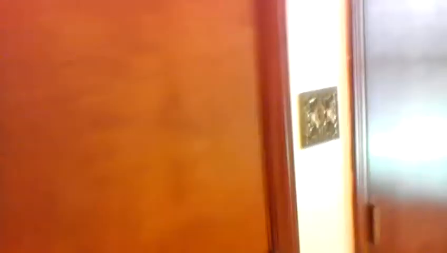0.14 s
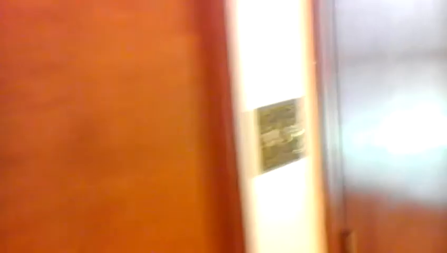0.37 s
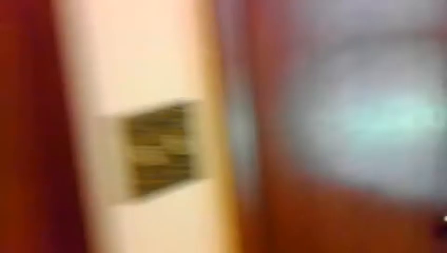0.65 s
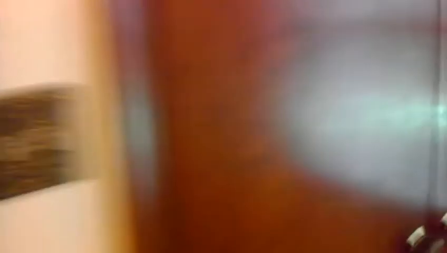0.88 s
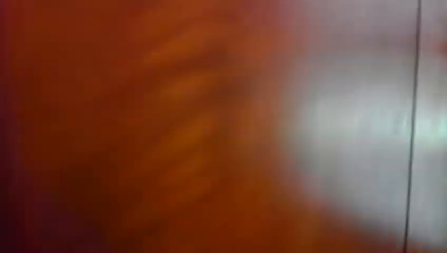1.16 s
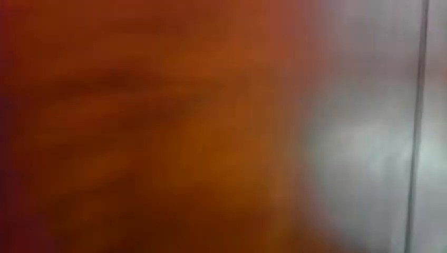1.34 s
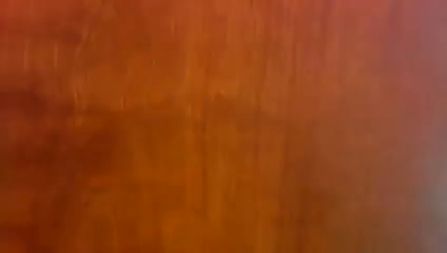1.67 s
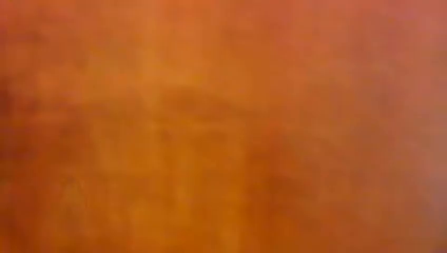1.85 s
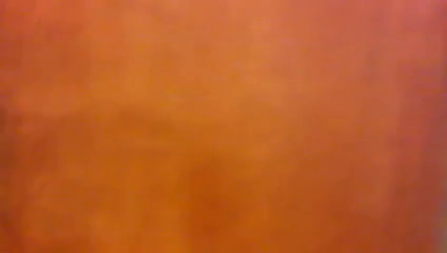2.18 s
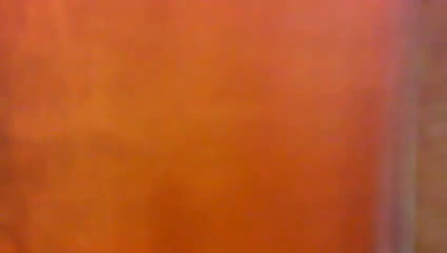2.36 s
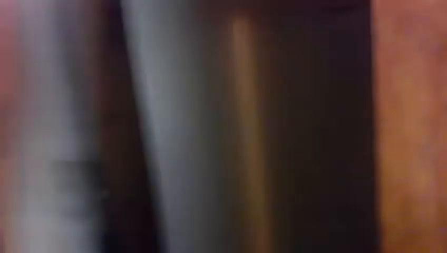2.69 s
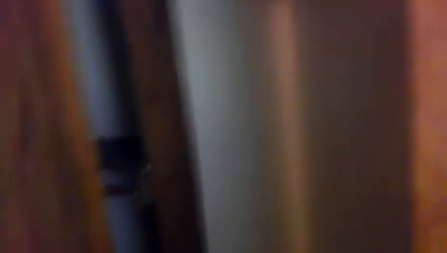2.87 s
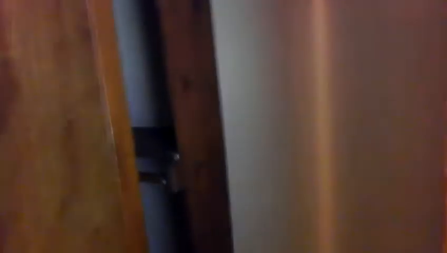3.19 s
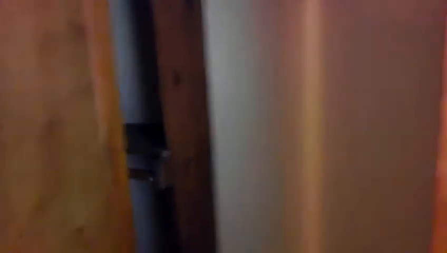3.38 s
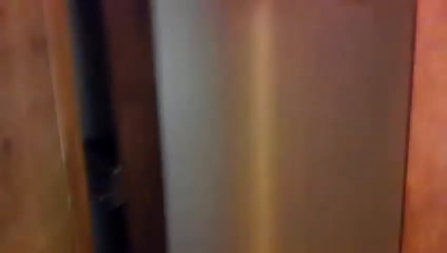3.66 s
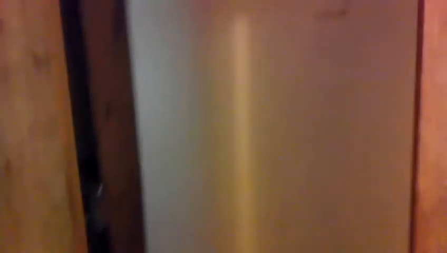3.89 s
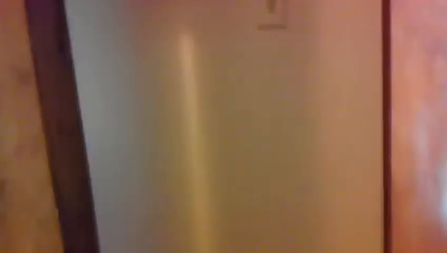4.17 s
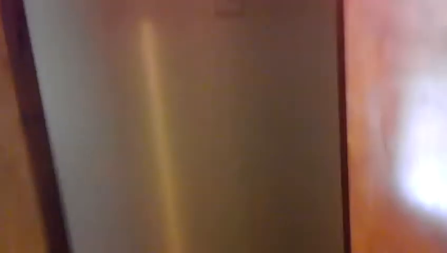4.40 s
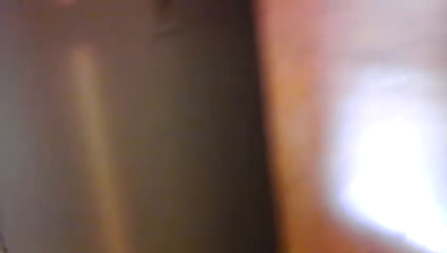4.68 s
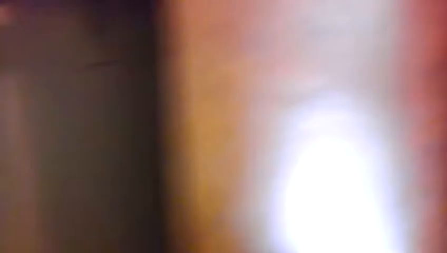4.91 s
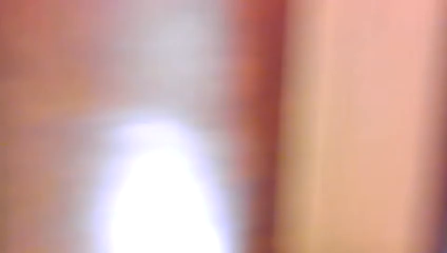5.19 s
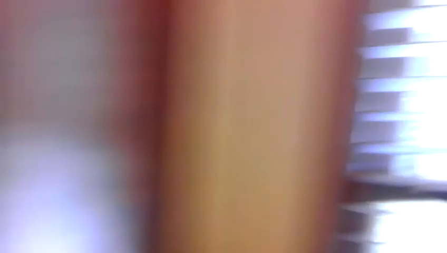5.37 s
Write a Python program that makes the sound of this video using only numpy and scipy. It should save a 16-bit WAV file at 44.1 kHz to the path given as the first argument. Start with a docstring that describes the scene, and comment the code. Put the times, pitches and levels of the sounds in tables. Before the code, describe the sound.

Indoors, one wooden door latches and another bangs free with a rattle, followed by a hollow knock and quiet footsteps.

```python
"""A small hall, heard from a stereo microphone carried by someone shutting and opening wooden doors.
A hinge squeaks and a door claps into its latch; a closet door knocks three times against its frame,
bangs free close by and rattles as it opens. Each blow is a crack, ringing boards and a short room tail.
Soft steps, hollow wooden knocks and rustling clothes come and go over a faint mains hum."""
import sys
import numpy as np
from scipy import signal
from scipy.fft import rfft, irfft
from scipy.io import wavfile

SR = 44100
rng = np.random.default_rng(int(sys.argv[2]) if len(sys.argv) > 2 else 0)


def dump_mix(stems):
    """Bounce the given channels to the path in sys.argv[1] as a 16-bit WAV at rate SR."""
    frames = np.atleast_2d(stems).T  # one column per channel
    limited = np.clip(frames, -1, 1)  # hard clip at full scale
    pcm = np.round(limited * 32767).astype(np.int16)
    wavfile.write(sys.argv[1], SR, pcm)


N = 244314

# movements of the walker or a door: start_s, length_s, rise_s, rub_db, hiss_db, rumble_db
MOVEMENTS = [(0, 0.43, 0.0033, -53, -60.5, -50), (0.417, 0.65, 0.25, -53, -58, -51),
             (0.851, 0.17, 0.057, -42, -52, -60), (1.161, 0.47, 0.23, -50, -59.5, -42.5),
             (1.676, 0.84, 0.054, -51, -71, -42.5), (2.495, 0.15, 0.14, -41.5, -63, -71),
             (2.738, 0.054, 0.032, -46.5, -61.5, -56), (3.06, 0.051, 0.033, -57.5, -63.5, -55),
             (3.168, 0.51, .06, -65, -70.5, -65), (3.605, 0.56, 0.26, -52.5, -60.5, -54.5),
             (4.166, .11, 0.046, -44.5, -58, -67), (4.277, 0.094, 0.062, -46.5, -58.5, -47.5),
             (4.659, 0.46, 0.036, -55.5, -60.5, -51), (5.22, 0.3, 0.11, -56, -61.5, -47.5)]


def closet_bang(flex_hz=268, flex_peak_s=0.0069, flex_boost_db=2):
    """Close to the microphone the closet door breaks free, and its whole panel flexes for a few cycles."""
    # the bang: start_s, level_db, bass_db, treble_db, crack_t60_s, tail_db, ring_db
    bangs = [(2.1041, 0.83, -2.5, 0, 0.058, -18, -10)]
    # colour of its crack: freq_hz, density_db
    colour = [(45, -19), (90, 4), (160, 7), (290, 3), (450, -5), (750, -10), (1400, -6.5), (2600, -16.5),
              (4200, -28), (6200, -29.5), (9000, -34.5), (14000, -50)]
    # modes of the freed door: pitch_hz, level_db, t60_s
    modes = [(91, -14, 1.2), (145, -3, .5), (214, -6, .45), (248, -1, .55), (295, 0, .48), (443, -12, .4),
             (548, -6, .25), (668, -16, .3), (822, -13, .33), (894, -12, .23), (1128, -17, .44),
             (1542, -19, .3)]
    t = np.arange(SR) / SR
    swell = (t / flex_peak_s * np.exp(1 - t / flex_peak_s)) ** 4
    flex = swell * np.sin(2 * np.pi * flex_hz * t)
    mix = wood_blows(bangs, colour, modes, tail_treble_db=-16.5, pan_db=-0.9)
    for start_s, level_db, *_ in bangs:
        add(mix, start_s, amp(level_db + flex_boost_db) * flex[None])
    return mix


def closet_knocks():
    """The closet door knocks against its frame and its panel rings."""
    # the knocks: start_s, level_db, bass_db, treble_db, crack_t60_s, tail_db, ring_db
    blows = [(1.717, -29, 3.5, 2, 0.043, -13, 2.5), (1.8055, -11, 0.5, -9.5, 0.061, -9.5, -4.5),
             (1.9475, -13, 11.5, -1, 0.14, -9.5, -11.5)]
    # colour of wood on wood: freq_hz, density_db
    colour = [(45, -9), (90, -2.5), (160, 7.5), (280, 10.5), (450, 4), (850, 3.5), (1300, 1.5), (2600, -5),
              (4200, -16.5), (6000, -24), (9000, -22), (14000, -70)]
    # modes of the closet door: pitch_hz, level_db, t60_s
    modes = [(95.1, 3.5, 0.47), (167.3, 8, 0.54), (178.6, -0.5, 0.37), (213, -1, 0.2), (296.4, -17, 0.58),
             (354, -10.5, 0.81), (479, -12.5, 0.51), (520, 0.5, 0.4), (520, -0.5, 0.59), (800, -13.5, 0.41),
             (893, -25.5, 0.098), (1230, -0.5, 0.099)]
    return wood_blows(blows, colour, modes, tail_treble_db=-21, pan_db=-1.3)


def latching_door():
    """A door claps into its latch and rings on."""
    # the clap: start_s, level_db, bass_db, treble_db, crack_t60_s, tail_db, ring_db
    claps = [(0.9595, -13.5, -0.54, 0.027, 0.068, 0, -6)]
    # colour of the clap: freq_hz, density_db
    colour = [(45, -17.5), (90, -8), (190, -1.5), (380, 2), (560, -10.5), (850, -6), (1500, -10),
              (2400, -9), (3100, 0), (4200, -28.5), (6200, -8), (8000, -30), (11500, -17.5), (14000, -44)]
    # modes of this door: pitch_hz, level_db, t60_s
    modes = [(181.4, 4.5, 0.99), (244.6, 5.5, 0.94), (368.4, 2, 0.49), (436.4, -1, 0.48), (547, 3, 0.51),
             (843, -14.5, 0.7), (1157, -17, 0.31), (1640, -17.5, 0.33), (1900, -10.5, 0.27),
             (2401, -11, 0.63), (2430, -15.5, 0.32), (3300, -12, 0.38), (3000, -10.5, 0.23),
             (3332, -16.5, 0.33)]
    return wood_blows(claps, colour, modes, tail_treble_db=-7, pan_db=-1.6)


def bolt():
    """The steel bolt pings briefly each time it meets its plate."""
    # snaps against the plate: start_s, level_db
    pings = [(0.9587, -13), (1.715, -40), (1.806, -31)]
    # modes of the bolt: pitch_hz, level_db, t60_s
    modes = [(2340, -5, .06), (2680, -2, .06), (2875, 0, .08), (3046, -2, .06), (3216, -1, .05),
             (3420, -5, .04)]
    mix = np.zeros((2, N))
    for start_s, level_db in pings:
        add(mix, start_s, amp(level_db) * ring(modes)[None])
    return mix


def catch_clicks():
    """Catch and hinges click and rattle; harder contacts are brighter."""
    # contacts: start_s, level_db, treble_db
    clicks = [(.382, -32.5, -16), (0.5944, -29.5, -25), (1.116, -18.5, -17), (1.89, -39.5, 15.5),
              (1.980, -49.5, 39.5), (1.991, -46, 33), (2.134, -21.5, 2), (2.268, -14.5, -19),
              (2.330, -20.5, -15.5), (2.393, -21.5, -10), (2.412, -24, -32), (2.449, -26.5, -15),
              (2.472, -29.5, -18), (2.509, -33.5, 2), (4.05, -36.5, -9), (4.273, -42.5, -4),
              (4.693, -51, -15), (5.039, -53, 18), (5.08, -55, 9)]
    # colour of the catch: freq_hz, density_db
    colour = [(60, -30.5), (250, 10), (800, -1), (1700, 3.5), (3000, 1), (4500, -10), (8000, -21.5),
              (14000, -39)]
    mix = np.zeros((2, N))
    for start_s, level_db, treble_db in clicks:
        click = crack(colour, t60_s=0.056, tail_db=-11, tail_treble_db=-2, treble_db=treble_db)
        add(mix, start_s, amp(level_db) * click)
    return mix


def hollow_knocks(bass_db=-2, treble_db=-1, t60_s=0.073, tail_db=-11):
    """Hollow wooden knocks: the door just before it latches, then two later ones."""
    # the knocks: start_s, level_db, ring_db
    knocks = [(.932, -27.5, 4), (3.869, -21, 1), (4.249, -35, 2)]
    # their hollow colour: freq_hz, density_db
    colour = [(45, -20.5), (100, -7), (160, 0.5), (250, 7.5), (400, 4.5), (700, -2), (950, -12),
              (1400, -37.5), (4000, -47), (14000, -44)]
    # modes of the wood: pitch_hz, level_db, t60_s
    modes = [(157, -8, 0.4), (285, -24, 0.1), (332, -7.5, 0.14), (372, 3.5, 0.11), (492, -2, 0.16),
             (550, 2.5, 0.049), (697, -13, .15)]
    blows = [(start_s, level_db, bass_db, treble_db, t60_s, tail_db, ring_db)
             for start_s, level_db, ring_db in knocks]
    return wood_blows(blows, colour, modes, tail_treble_db=0.5, pan_db=-0.5)


def steps():
    """Soft footfalls; the more weight on the foot, the deeper the thud."""
    # feet on the floor: start_s, level_db, bass_db
    footfalls = [(0.603, -32.5, -10.5), (0.739, -27, -24), (1.159, -35.5, 14), (1.377, -21, -20),
                 (3.193, -38, -1), (3.254, -50, -14), (3.535, -44.5, 11.5), (3.594, -43.5, 6.5),
                 (5.114, -31, -26), (5.355, -27.5, -30)]
    # colour of a thud: freq_hz, density_db
    colour = [(40, -9.5), (75, -3), (130, 6.5), (220, -2.5), (350, -11.5), (800, -26), (3000, -46.5),
              (14000, -59)]
    mix = np.zeros((2, N))
    for start_s, level_db, bass_db in footfalls:
        thud = crack(colour, t60_s=0.16, tail_db=-17, tail_treble_db=-8.5, bass_db=bass_db, treble_db=-8)
        add(mix, start_s, amp(level_db) * thud)
    return mix


def hand_bumps():
    """A hand bumps along the closet door, too lightly to leave a clear tone."""
    # pats on the wood: start_s, level_db
    pats = [(1.238, -32), (1.370, -35.5), (1.495, -32.5), (1.616, -35.5)]
    # colour of a pat: freq_hz, density_db
    colour = [(100, -21.5), (400, 2.5), (900, 3), (1400, -6.5), (2200, -13.5), (4000, -25.5), (14000, -50)]
    mix = np.zeros((2, N))
    for start_s, level_db in pats:
        add(mix, start_s, amp(level_db) * crack(colour, t60_s=0.1, tail_db=-12, tail_treble_db=-3))
    return mix


def rustle(rub_boost_db=6, snag_db=-9, snags_per_s=70, release_s=0.017):
    """Cloth and door edges slide unevenly, with a fine hiss; folds snag and let go."""
    # colour of rubbing cloth: freq_hz, density_db
    rub_colour = [(100, -22), (280, 0), (550, 2), (1100, 4), (1700, -4), (2800, -7), (4500, -14.5),
                  (7000, -24.5), (14000, -37.5)]
    # colour of the hiss: freq_hz, density_db
    hiss_colour = [(2000, -19.5), (4500, -6.5), (7000, -5), (9000, -2.5), (12000, -3), (14000, -7.5)]
    snags = (rng.random(N) < snags_per_s / SR) * rng.exponential(1, N)
    release = np.exp(-np.arange(SR // 20) / SR / release_s)
    snag_lift = amp(snag_db) * unit_rms(signal.oaconvolve(snags, release)[:N])
    *_, rub_db, hiss_db, _ = np.transpose(MOVEMENTS)
    rubbing = movement_gain(rub_db + rub_boost_db, fade_db_per_s=122.5) * steady_noise(rub_colour)
    hiss = movement_gain(hiss_db, fade_db_per_s=72.5) * steady_noise(hiss_colour)
    return rubbing * np.hypot(1, snag_lift) + hiss


def rumble(boost_db=1, uneven_db=0.5):
    """Swinging doors and loaded boards shudder with each movement."""
    # colour of the shudder: freq_hz, density_db
    colour = [(30, -20.5), (60, -11.5), (100, -8.5), (130, 0.5), (165, 3), (200, 4.5), (225, 3), (275, 0.5),
              (450, -5), (900, -19.5), (3000, -49.5)]
    *_, rumble_db = np.transpose(MOVEMENTS)
    shudder = amp(boost_db - uneven_db * flutter(rate_hz=12))
    return movement_gain(rumble_db, fade_db_per_s=41.5) * shudder * steady_noise(colour)


def hinge(waver=0.006):
    """A dry hinge pin sings for a moment at an unsteady pitch."""
    # thin squeaks: start_s, length_s, pitch_hz, level_db
    squeaks = [(0.556, 0.042, 8500, -60), (0.701, 0.045, 8570, -55)]
    mix = np.zeros((2, N))
    unsteady = 1 + waver * flutter(rate_hz=120)
    for start_s, length_s, pitch_hz, level_db in squeaks:
        wavering_hz = pitch_hz * unsteady[round(start_s * SR):][:round(length_s * SR)]
        cycles = np.cumsum(wavering_hz) / SR
        squeak = np.hanning(len(cycles)) * np.sin(2 * np.pi * cycles)
        add(mix, start_s, amp(level_db) * squeak[None])
    return mix


def room_tone(air_db=-66, hum_hz=120):
    """Faint air in the hall, and a mains hum that is louder at first."""
    # colour of the air: freq_hz, density_db
    air_colour = [(18, -45.5), (30, -25), (109, -18.5), (336, -28.5), (941, -10.5), (1420, -19),
                  (2140, -10), (5010, -28), (6310, -34), (12600, -17.5), (14000, -40)]
    # course of the hum: time_s, level_db
    hum_levels = [(.47, -51), (.6, -63)]
    hum = gain_curve(hum_levels) * np.sin(2 * np.pi * hum_hz * np.arange(N) / SR)
    return amp(air_db) * steady_noise(air_colour) + hum


def wood_blows(blows, colour, modes, tail_treble_db, pan_db):
    """Each blow cracks and sets the board ringing; pan_db is left minus right."""
    mix = np.zeros((2, N))
    for start_s, level_db, bass_db, treble_db, t60_s, tail_db, ring_db in blows:
        board = amp(ring_db) * ring(modes, bass_db, treble_db)
        contact = crack(colour, t60_s, tail_db, tail_treble_db, bass_db, treble_db)
        add(mix, start_s, amp(level_db) * (contact + board))
    return mix * amp([[pan_db / 2], [-pan_db / 2]])


def crack(colour, t60_s, tail_db, tail_treble_db, bass_db=0, treble_db=0, bands=18, fill_s=0.0095):
    """Countless short modes die at once; the hall keeps each band sounding for its own time."""
    # resonances of door boards and fittings: centre_hz, width_hz, boost_db
    fittings = [(886, 70, 2.5), (1160, 20, 11), (1580, 20, 2.5), (1940, 200, 3.5), (2420, 110, 0.5),
                (2420, 210, 0.5), (2660, 30, 2), (2820, 23, 7.5), (3210, 29, -14.5), (3864, 270, 10.5),
                (5700, 1500, 2.5)]
    # reverberation of the hall: freq_hz, t60_s
    hall_decay = [(60, 0.62), (150, 1.09), (300, 0.3), (600, 0.79), (1500, 0.53), (3000, 0.38),
                  (6000, 0.41), (13000, 0.29)]
    t = np.arange(SR) / SR
    centres = np.geomspace(42, 15000, bands)
    hz, noise = stereo_spectra(len(t))
    noise *= amp(sum(db / (1 + (2 * (hz - centre) / width) ** 2) for centre, width, db in fittings))
    weights = amp(value_at(colour, centres)) * np.sqrt(centres)
    weights = weights / np.linalg.norm(weights) * tilt(centres, bass_db, treble_db)
    direct = decay(t, t60_s)
    hall_fill = 1 - np.exp(-t / fill_s)
    mix = np.zeros((2, len(t)))
    for centre, weight, this_band in zip(centres, weights, np.eye(bands)):
        band = irfft(noise * np.sqrt(np.interp(hz, centres, this_band)), len(t))
        wall_return = amp(tail_db + tail_treble_db / (1 + (6000 / centre) ** 4))
        tail = wall_return * hall_fill * decay(t, value_at(hall_decay, centre))
        attack = 1 - np.exp(-t / (0.0006 + 0.5 / centre))  # low bands take about a cycle to build up
        envelope = np.hypot(direct, tail) * attack
        mix += weight * np.sqrt(np.mean(envelope ** 2)) * unit_rms(band * envelope)
    return mix


def ring(modes, bass_db=0, treble_db=0, attack_s=0.00073):
    """The few strong modes of a struck board or bolt, as dying sines of alternating sign."""
    t = np.arange(SR) / SR
    gains = amp([db for _, db, _ in modes])
    gains = gains / np.linalg.norm(gains) * np.sqrt(2)
    tone = np.zeros(len(t))
    for k, (hz, _, t60_s) in enumerate(modes):
        strength = (-1) ** k * gains[k] * tilt(hz, bass_db, treble_db)
        tone += strength * np.sin(2 * np.pi * hz * t) * decay(t, t60_s)
    return tone * (1 - np.exp(-t / attack_s))


def tilt(hz, bass_db, treble_db):
    """A heavy contact adds bass, a hard one treble."""
    return amp(bass_db / (1 + (hz / 170) ** 2) + treble_db / (1 + (2500 / hz) ** 2))


def movement_gain(levels_db, fade_db_per_s):
    """Gain for every sample: each movement builds up, holds, then dies away once it stops."""
    t, power = np.arange(N) / SR, np.zeros(N)
    for (start_s, length_s, rise_s, *_), level_db in zip(MOVEMENTS, levels_db):
        onset = np.clip((t - start_s) / rise_s, 0, 1)
        stopped_s = np.maximum(t - start_s - length_s, 0)
        power += (onset * amp(level_db - fade_db_per_s * stopped_s)) ** 2
    return np.sqrt(power)


def stereo_spectra(size, walls=5):
    """Noise at the two capsules: alike in the bass, diffuse in the treble, rippled by near walls."""
    # likeness of left and right: freq_hz, coherence
    likeness = [(60, 0.9), (250, 0.94), (500, 0.84), (1000, 0.48), (2500, 0.21), (13000, 0.083)]
    hz = np.fft.rfftfreq(size, 1 / SR)
    common, apart = rng.standard_normal((2, len(hz))) + 1j * rng.standard_normal((2, len(hz)))
    coherence = value_at(likeness, hz)
    mid, side = np.sqrt(1 + coherence) * common, np.sqrt(1 - coherence) * apart
    reflections = rng.uniform([0.001, 0], [0.008, 1], (walls, 2))
    comb = sum(np.cos(2 * np.pi * (hz * delay_s + turns)) for delay_s, turns in reflections)
    ripple = np.exp(0.18 * comb * hz / (hz + 500))
    return hz, ripple * np.array([mid + side, mid - side])


def steady_noise(colour):
    """Unbroken stereo noise of a given colour."""
    hz, noise = stereo_spectra(N)
    return unit_rms(irfft(noise * amp(value_at(colour, hz)), N))


def flutter(rate_hz):
    """A random wander with unit spread, mostly slower than rate_hz."""
    hz = np.fft.rfftfreq(N, 1 / SR)
    return unit_rms(irfft(rfft(rng.standard_normal(N)) / (1 + (hz / rate_hz) ** 2), N))


def value_at(points, hz):
    """Points joined by straight lines on a log-frequency axis."""
    point_hz, values = np.transpose(points)
    return np.interp(np.log(hz + 1), np.log(point_hz + 1), values)


def gain_curve(points):
    """A level curve in dB as a gain for every sample."""
    time_s, level_db = np.transpose(points)
    return amp(np.interp(np.arange(N) / SR, time_s, level_db))


def decay(t, t60_s):
    return np.exp(-np.log(1000) * t / t60_s)


def amp(db):
    return 10 ** (np.asarray(db) / 20)


def unit_rms(x):
    return x / np.sqrt(np.mean(x ** 2) + 1e-20)


def add(mix, start_s, sound):
    part = mix[:, round(start_s * SR):][:, :sound.shape[1]]
    part += sound[:, :part.shape[1]]


def scene():
    """Doors, walker and hall at the microphone; the walker sways between right of centre and centre."""
    # side on which the walker's body lies: time_s, left_minus_right_db
    sway = [(2.9, -1.5), (3.1, 0), (3.5, 0), (3.8, -1)]
    door = latching_door() + bolt() + hinge()
    closet = closet_knocks() + closet_bang()
    left_gain = np.sqrt(gain_curve(sway))
    walker = (steps() + rustle()) * np.array([left_gain, 1 / left_gain])
    contacts = hollow_knocks() + catch_clicks() + hand_bumps()
    return door + closet + contacts + walker + rumble() + room_tone()


def record(dry, low_cut_hz=40, high_cut_hz=14200):
    """A small microphone loses the lowest bass; the bang overloads the input; the top treble is cut."""
    low_cut = signal.butter(2, low_cut_hz, "highpass", fs=SR, output="sos")
    high_cut = signal.firwin(511, high_cut_hz, window=("kaiser", 9), fs=SR)
    clipped = np.clip(signal.sosfilt(low_cut, dry), -1, 1)
    return signal.oaconvolve(clipped, high_cut[None], "same")


dry = scene()
out = record(dry)
dump_mix(out)
```